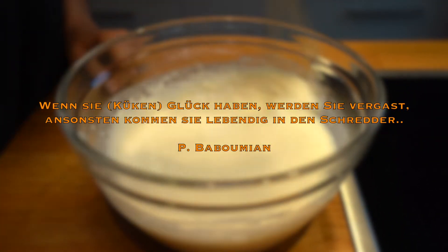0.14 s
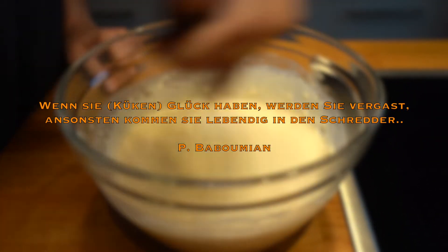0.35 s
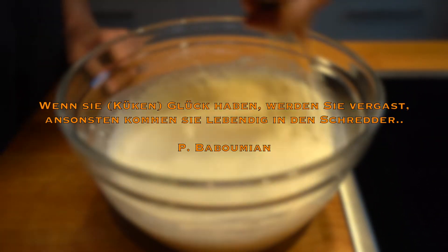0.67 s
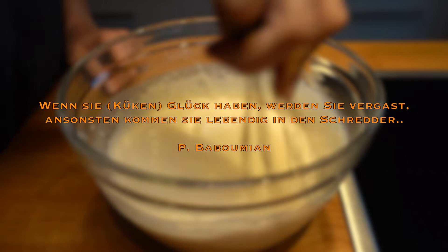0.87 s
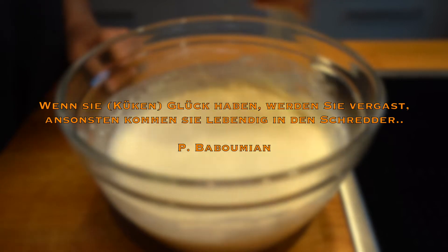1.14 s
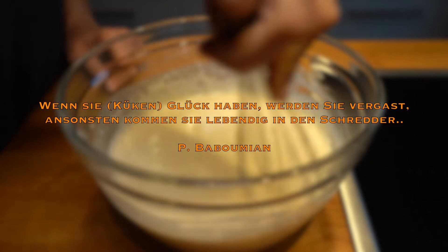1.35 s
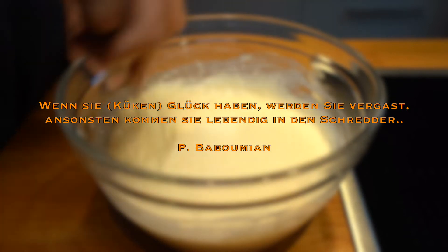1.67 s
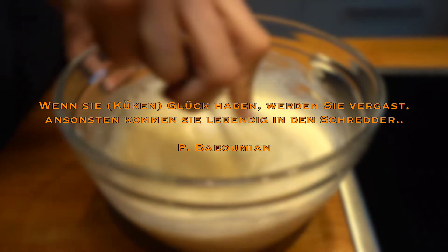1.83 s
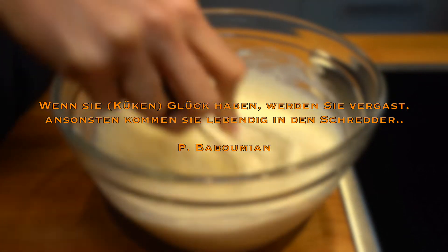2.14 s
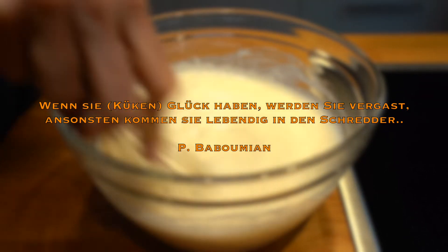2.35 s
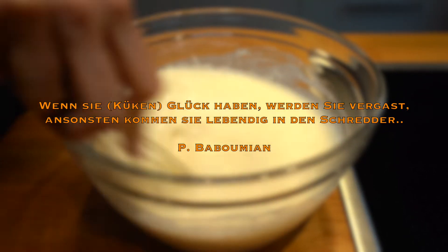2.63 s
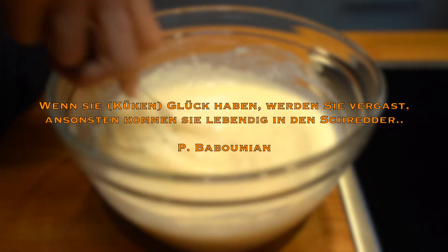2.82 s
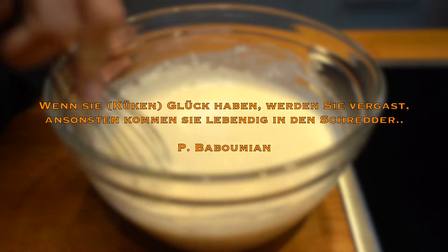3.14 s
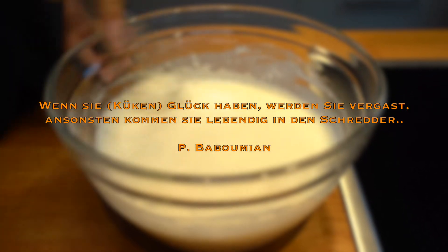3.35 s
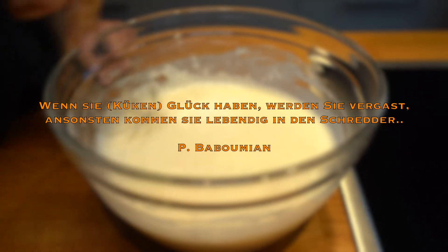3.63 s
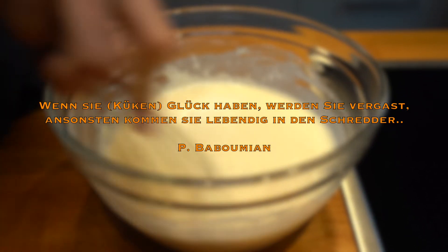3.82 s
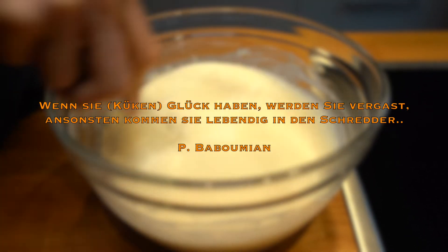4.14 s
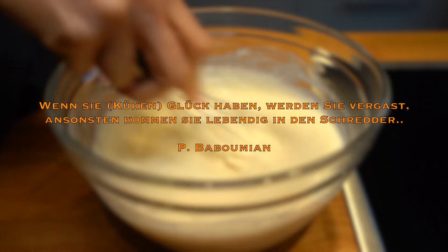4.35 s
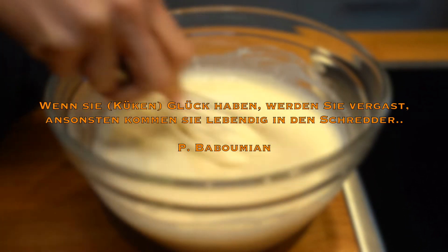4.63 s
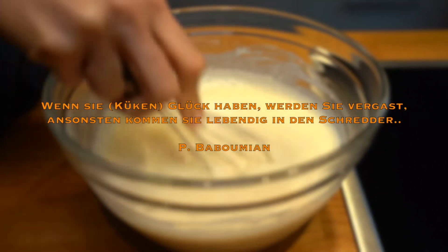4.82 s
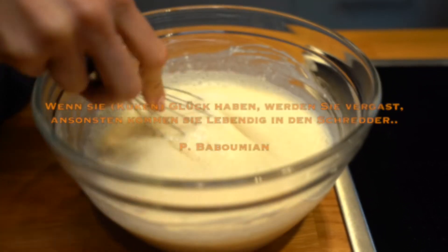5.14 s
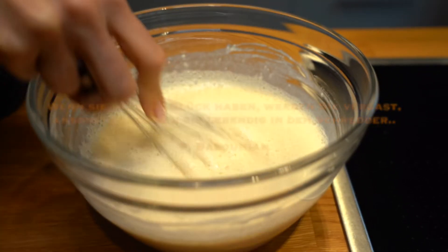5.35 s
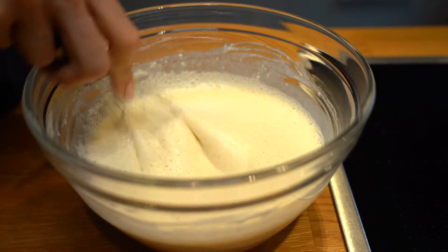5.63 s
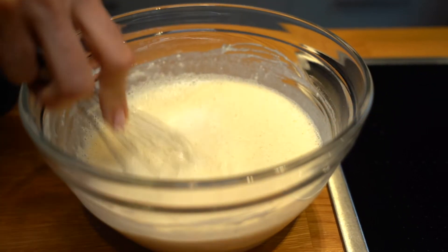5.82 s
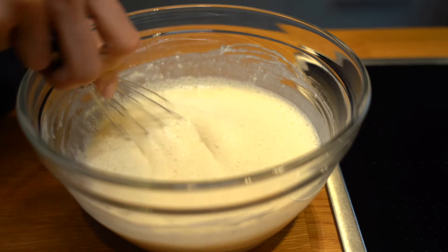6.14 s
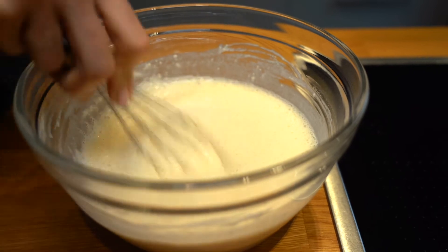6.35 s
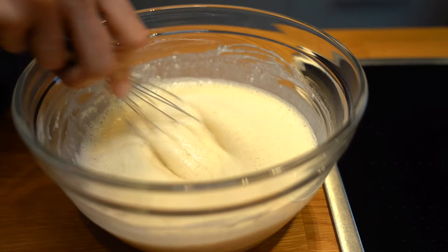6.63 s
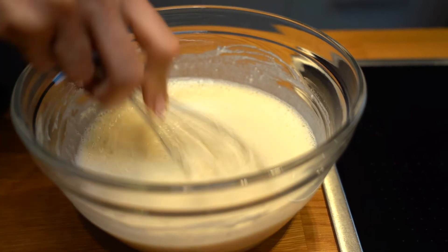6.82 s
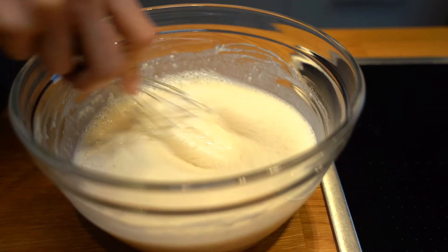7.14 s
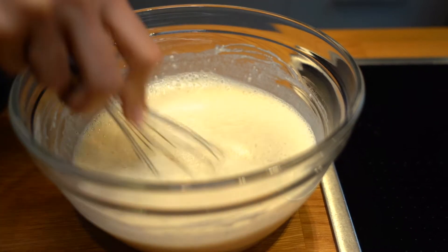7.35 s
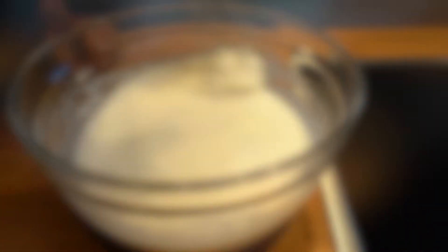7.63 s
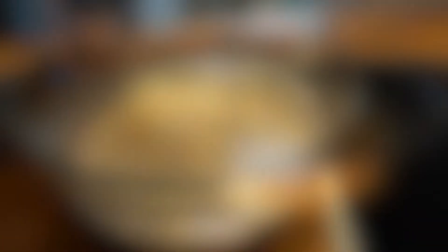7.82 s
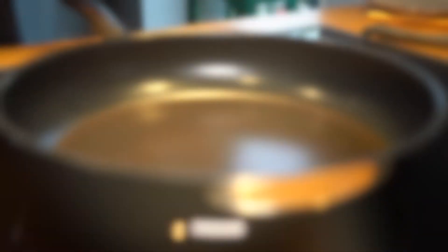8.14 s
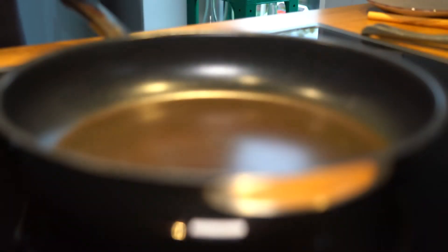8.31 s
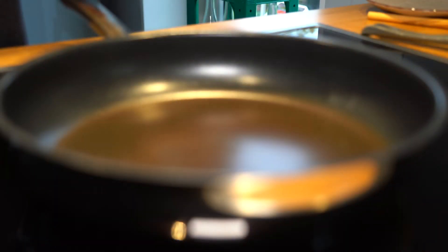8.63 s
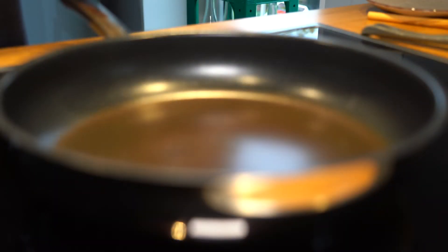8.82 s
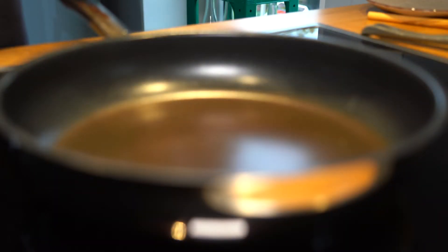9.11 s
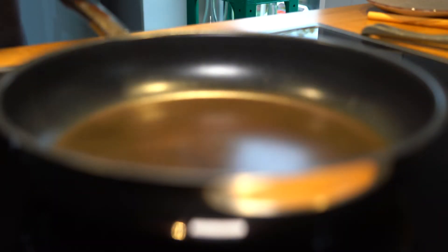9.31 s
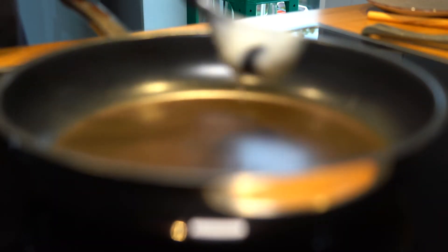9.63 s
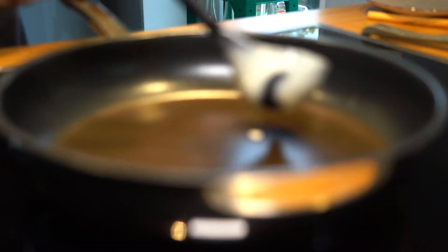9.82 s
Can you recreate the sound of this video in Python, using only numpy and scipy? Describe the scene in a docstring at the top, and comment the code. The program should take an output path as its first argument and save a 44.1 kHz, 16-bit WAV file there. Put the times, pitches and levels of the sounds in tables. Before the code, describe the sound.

A small kitchen, miked closely, with very faint room tone and a short dull reflection. From 0 to 2 s a wire whisk goes round slowly and unevenly in thin batter: wires scrape the glass bowl into brief ringing, with frothy swishes, ticks and a strong clatter near 1.2 s. From 2 to 4 s it is softer and sparser, with low wet plops and knocks, and a few scrapes around 3.6 s. From about 4.1 to 7.1 s it beats quickly, about eight strokes a second, wet and gurgling with bright wire ticks; the bowl thumps hard on the worktop at 6.5 s. Beating dwindles, and a glassy knock sounds at 7.7 s. From 7.5 to 8.3 s hob fan noise swells in with airy vents, crackling hiss, sizzle and thin high whine, then gradually gets duller and quieter. A pan drones roughly at 8.1-8.3 s; two low knocks follow at 9.3 and 9.4 s.

```python
"""A small kitchen, microphone close: a wire whisk beats thin batter in a glass bowl over faint room tone.
At first slow rounds: wires scrape the glass into ringing, swish through froth (swarms of tiny pings),
tick and knock; air pockets plop as damped, rising sines. Then about eight beats a second, with gurgles.
Late on the hob swells in: filtered-noise fan and vents, a crackling hiss, a sizzle and a thin whine.
A pan drones briefly on the hob, and near the end the bowl knocks twice on the worktop."""
import sys
import numpy as np
from scipy import signal
from scipy.fft import rfft, irfft
from scipy.io import wavfile
from scipy.ndimage import uniform_filter1d, map_coordinates

SR = 44100
rng = np.random.default_rng(int(sys.argv[2]) if len(sys.argv) > 2 else 0)


def dump_mix(stems):
    """Bounce the given channels to the path in sys.argv[1] as a 16-bit WAV at rate SR."""
    frames = np.atleast_2d(stems).T  # one column per channel
    limited = np.clip(frames, -1, 1)  # hard clip at full scale
    pcm = np.round(limited * 32767).astype(np.int16)
    wavfile.write(sys.argv[1], SR, pcm)


N = 439677
TIME = np.arange(N) / SR
FREQS = np.arange(N // 2 + 1) * SR / N


def undb(db):
    """Decibels to gain."""
    return 10 ** (np.asarray(db) / 20)


def unit(x):
    """Scale to rms 1."""
    return x / np.sqrt(np.mean(x ** 2))


def peak(x):
    """Scale to peak 1."""
    return x / np.abs(x).max()


def add(track, s, x):
    """Mix x into the track from time s."""
    i = max(int(s * SR), 0)
    track[i:i + len(x)] += x[:max(N - i, 0)]


def fade(t, t60):
    """Exponential decay by 60 dB in t60 seconds."""
    return np.exp(-np.log(1000) * t / max(t60, 1e-3))


def filtered(x, cutoff_hz, kind="low"):
    """Second-order Butterworth filter."""
    return signal.sosfilt(signal.butter(2, cutoff_hz, kind, fs=SR, output="sos"), x)


def colour(x, points, resonances=(), size=16384):
    """Causal filter from (f/Hz, level/dB) and (f/Hz, width/Hz, lift/dB); keeps the power of white noise."""
    hz, db = np.transpose(points)
    freqs = np.arange(size // 2 + 1) * SR / size
    curve = np.interp(np.log(freqs + 1), np.log(hz), db)
    for centre, width, lift in resonances:
        curve = curve + lift / (1 + (2 * (freqs - centre) / width) ** 2)
    # folding the cepstrum onto positive times gives the minimum-phase response
    cepstrum = irfft(np.log(unit(undb(curve))))
    cepstrum[1:size // 2] *= 2
    cepstrum[size // 2 + 1:] = 0
    response = irfft(np.exp(rfft(cepstrum)))
    return signal.oaconvolve(x, response)[:N]


def walk(rate):
    """Smooth random wander at about rate steps a second, with a spread near 1."""
    k = max(int(SR / rate), 1)
    steps = np.repeat(rng.standard_normal(N // k + 1), k)[:N]
    return unit(uniform_filter1d(steps, k))


def crackle(n, per_s, spread_db):
    """n samples of random clicks of uneven size, rms 1."""
    chance, size, sign = rng.random((n, 3)).T
    loudness_db = spread_db * np.minimum(-np.log(1 - size), 4)
    clicks = (chance < per_s / SR) * np.sign(sign - .5) * undb(loudness_db)
    return unit(clicks + 1e-9)


def grains(points, count, size, t60, spread_db, patchy_db):
    """Tiny bubbles burst as pings, count at each of size pitches; alike sizes come in swarms; rms 1."""
    hz, db = np.transpose(points)
    out = np.zeros(N)
    swarms = rng.standard_normal((N // 1000 + 2, 64))  # steps of about 23 ms by quarter octaves
    for f in np.geomspace(hz[0], min(hz[-1], .45 * SR), size):
        bursts, when = np.zeros(N), rng.integers(0, N, count)
        swarm = map_coordinates(swarms, [when / 1000, np.full(count, 4 * np.log2(f))], order=1)
        uneven = np.minimum(rng.exponential(size=count), 4)
        bursts[when] = rng.choice([-1, 1], count) * undb(patchy_db * swarm + spread_db * uneven)
        # a two-pole resonator turns each burst into a decaying ping
        r = fade(1 / SR, t60)
        poles = [1, -2 * r * np.cos(2 * np.pi * f / SR), r * r]
        pings = signal.lfilter([1, 0, -1], poles, bursts)
        # sqrt(f): the pitches lie further apart higher up, and the table is per Hz
        out += unit(pings) * np.sqrt(f) * undb(np.interp(np.log(f), np.log(hz), db))
    return unit(out)


def ring(modes, length, detune=0., scatter_db=0.):
    """A struck body's modes; pitch and strength vary with the point of contact."""
    t = np.arange(int(length * SR)) / SR
    out = 0
    for (hz, db, t60), (a, b, c) in zip(modes, rng.standard_normal((len(modes), 3))):
        gain = np.sign(c) * undb(db + scatter_db * a)
        out = out + gain * fade(t, t60) * np.sin(2 * np.pi * hz * (1 + detune * b) * t)
    return out


def bubble(hz, t60, glide):
    """An air pocket in thick liquid: swells within a cycle or two, rises a little in pitch and dies fast."""
    t = np.arange(int(t60 * SR) + 2) / SR
    swell = (1 - np.exp(-t * hz / 1.05)) ** 2
    return peak(swell * fade(t, t60) * np.sin(2 * np.pi * hz * t * (1 + glide * t / t60)))


def resonance(hz, width_hz):
    """A resonance follows a pitch curve, kept ringing by a stream of tiny pushes; fades in and out."""
    n = len(hz)
    turn = np.exp(2j * np.pi * np.cumsum(hz) / SR)
    pushes = crackle(n, per_s=3000, spread_db=3) / turn
    held = signal.lfilter([1], [1, -np.exp(-np.pi * width_hz / SR)], pushes)
    return unit((held * turn).imag) * signal.windows.tukey(n, .6)


def waver(n, depth_db, every=1000):
    """Gain of one mode as whisk and batter load the wall unevenly; a new level every so many samples."""
    steps = rng.standard_normal(SR // 100)
    return undb(depth_db * np.interp(np.arange(n) / every, np.arange(len(steps)), steps))


def glass_mode(hz, t60, split=0.0046, twin=0.75, sway=0.0024, damping_per_s=7.1):
    """The bowl is not quite round, so a mode beats with a twin; moving batter sways its pitch and damps it."""
    t = np.arange(SR // 3) / SR
    apart, phase = 2 * rng.random(2) - 1
    load = np.interp(t, np.linspace(0, .5, 40), rng.standard_normal(40))
    angle = 2 * np.pi * hz * np.cumsum(1 + sway * load) / SR
    pair = np.sin(angle) + twin * np.sin(angle * (1 + split * apart) + np.pi * phase)
    return fade(t, t60) * np.exp(-damping_per_s * t) * pair


# quiet of the room: f/Hz, relative level/dB per Hz
ROOM_SPECTRUM = [(25, -18), (70, -12), (130, 0.5), (200, 5.5), (400, -8), (600, -1), (1000, -11),
                 (3000, -15.5), (8000, -15), (16000, -18)]
# the open bowl colours the room tone: f/Hz, width/Hz, lift/dB
BOWL_HUM_RESONANCES = [(603, 22, 19), (1330, 39, 6)]


def room_tone():
    """The quiet of the room: faint steady noise, coloured by the open bowl."""
    return undb(-73.5) * colour(rng.standard_normal(N), ROOM_SPECTRUM, BOWL_HUM_RESONANCES)


# modes of the glass bowl: f/Hz, level/dB, t60/s before the batter's extra damping
GLASS_MODES = [(596, -13, .45), (1249, 2.5, .33), (2220, 2.5, .33), (3439, .5, .34), (4891, -1, .26),
               (6536, -2, .26), (6745, -5, .13), (8390, -2, .21), (8770, -7, .09), (10450, -12, .13),
               (12640, -9, .1)]
# wires dragged over the glass: t/s, length/s, ring level/dB (loudest 20 ms), rasp level/dB before colouring,
# f/Hz that the slipping favours, favour/dB
SCRAPE_EVENTS = [(0.007, 0.13, -65.5, -70, 1250, 11), (0.157, 0.032, -48.5, -52, 3220, 13),
                 (0.242, 0.056, -41, -50, 3600, 8), (0.294, 0.026, -42, -41.5, 1240, 3),
                 (0.411, 0.038, -46.5, -59, 3200, 26), (0.471, 0.049, -60, -80, 2220, 8),
                 (0.505, 0.046, -57, -73, 3300, 24), (0.559, 0.041, -57, -59, 2220, 11),
                 (0.605, 0.017, -58, -81, 1240, 27), (0.751, 0.01, -55, -41.5, 5700, 17),
                 (0.797, 0.015, -57, -58, 1680, 11), (0.967, 0.095, -54, -77, 2900, 18),
                 (1.068, 0.023, -55.5, -72, 1750, 29), (1.168, 0.074, -54, -71, 3400, 14),
                 (1.202, 0.02, -38, -43, 3400, 6), (1.263, 0.012, -41, -53, 2300, 17),
                 (1.293, 0.021, -51, -77, 2460, 29), (1.366, 0.023, -57.5, -84, 3440, 32),
                 (1.435, 0.043, -55.5, -58, 6550, 20), (1.543, 0.03, -55, -47.5, 1250, 14),
                 (1.617, 0.03, -53, -52.5, 1200, 14), (1.713, 0.026, -41, -43.5, 4300, 14.5),
                 (1.778, 0.02, -63, -56, 1250, 20), (2.137, 0.031, -51.5, -58, 1250, 22),
                 (2.575, 0.043, -57.5, -66, 1250, 23), (2.592, 0.035, -52, -57, 2960, 23),
                 (2.845, 0.0061, -65, -52.5, 2660, 18), (3.073, 0.023, -53, -58.5, 3040, 12),
                 (3.093, 0.025, -53, -89, 1300, 25), (3.189, 0.026, -60.5, -90, 3570, 9),
                 (3.265, 0.018, -65, -77, 1250, 11), (3.588, 0.031, -41.5, -47, 1760, -1.5),
                 (3.61, 0.082, -44.5, -54, 1510, 11), (3.677, 0.021, -45, -46, 5640, 23),
                 (3.725, 0.062, -53.5, -68, 1250, 1), (3.857, 0.02, -55, -56.5, 2220, 12),
                 (3.92, 0.0076, -58, -70, 3440, 32), (4.176, 0.031, -45, -41, 2720, 6),
                 (4.195, 0.039, -49.5, -56, 1810, 15), (6.419, 0.043, -49, -58, 1660, 14),
                 (7.042, 0.05, -53, -52, 2020, 6), (7.624, 0.024, -57, -52.5, 4900, 13),
                 (7.767, 0.14, -51.5, -83, 3800, 10), (7.945, 0.021, -49.5, -66, 5870, 4)]


def scrapes(favour_octaves=0.54, chatter_db=-11, chatter_t60=0.25):
    """Wires stick and slip over glass: a dry rasp pumps the bowl's modes, most near the slipping pitch."""
    rings, rasp = np.zeros(N), np.zeros(N)
    t = np.arange(SR // 4) / SR
    for s, length, ring_db, rasp_db, slip_hz, favour_db in SCRAPE_EVENTS:
        n = int(np.clip(length, .005, .2) * SR)
        # the springy wires chatter on against the wall as they leave it
        slips = undb(chatter_db) * crackle(len(t), per_s=790, spread_db=5.5) * fade(t, chatter_t60)
        slips[:n] += crackle(len(t), per_s=7000, spread_db=2.0)[:n] * signal.windows.tukey(n, .4)
        tone = 0
        for hz, db, t60 in GLASS_MODES:
            lift = favour_db * np.exp(-(np.log2(hz / slip_hz) / favour_octaves) ** 2)
            mode = glass_mode(hz, t60)
            mode = signal.fftconvolve(slips, mode)[:len(mode)]
            tone = tone + undb(db + lift) * unit(mode * waver(len(mode), depth_db=3.0, every=400))
        loudest = np.sqrt(uniform_filter1d(tone ** 2, SR // 50).max())
        add(rings, s, undb(ring_db) * tone / loudest)
        add(rasp, s, undb(rasp_db) * slips)
    rasp_colour = [(40, -24), (75, -27), (150, 8.0), (500, -25.0), (1500, 2), (3000, -18.5),
                   (5500, 8.0), (9000, 1.0), (10500, -1), (16000, -18.0)]
    rasp_resonances = [(1410, 230, 20.0), (2230, 110, 5.5), (2690, 320, 32), (3280, 120, 7.1),
                       (6790, 630, 21.5), (7480, 210, 15.0), (9200, 450, 13.0), (12200, 430, 12.0)]
    return rings + colour(rasp, rasp_colour, rasp_resonances)


STROKE_ATTACK_S, STROKE_ARCH_DB = 0.032, 3  # the wires cut in quickly and run fastest in mid-stroke
SWISH_T60_S, SLOSH_T60_S, FIZZ_T60_S = 0.13, 0.23, 0.21  # dying away after a stroke
# strokes through the batter, slow rounds at first, then about eight beats a second:
# t/s, length/s, wire swish level/dB, batter slosh level/dB, froth fizz level/dB
STROKE_EVENTS = [(0.109, 0.36, -59.5, -71.5, -62), (0.232, 0.051, -52, -57.5, -52),
                 (0.32, 0.37, -65.5, -68, -80), (0.656, 0.086, -66, -77, -66),
                 (0.785, 0.086, -73, -67.5, -78), (0.933, 0.062, -53.5, -72, -55.5),
                 (0.985, 0.032, -44, -87, -49.5), (1.029, 0.041, -51, -65, -80),
                 (1.154, 0.086, -48, -76, -50), (1.193, 0.026, -43, -47.5, -37.5),
                 (1.256, 0.025, -65, -61, -78), (1.336, 0.25, -67.5, -70, -102),
                 (1.524, 0.15, -62.5, -66.5, -57), (1.7, 0.043, -52, -53.5, -48),
                 (1.839, 0.23, -69, -68, -61), (2.099, 0.17, -60.5, -60, -55.5),
                 (2.363, 0.03, -66, -51.5, -65), (2.484, 0.082, -63, -61.5, -64.5),
                 (2.565, 0.081, -59, -52.5, -54.5), (2.775, 0.047, -66, -65, -79),
                 (3.066, 0.029, -67, -56.5, -76), (3.19, 0.25, -74, -85, -74), (3.562, 0.2, -59, -81, -68),
                 (3.754, 0.22, -67.5, -66.5, -82), (3.975, 0.29, -67, -76, -78),
                 (4.067, 0.11, -59, -65, -53), (4.171, 0.11, -57, -49.5, -55),
                 (4.294, 0.21, -61, -64, -61.5), (4.5, 0.17, -76.5, -64.5, -76),
                 (4.616, 0.032, -45.5, -42, -61), (4.717, 0.076, -65, -62.5, -64),
                 (4.845, 0.046, -51, -56.5, -80), (4.969, 0.042, -51.5, -58, -55),
                 (5.076, 0.088, -61, -55, -85), (5.2, 0.081, -58.5, -60, -75),
                 (5.329, 0.09, -59.5, -59, -68), (5.447, 0.084, -61, -63, -67),
                 (5.56, 0.13, -67.5, -69.5, -69), (5.658, 0.014, -66, -44, -70),
                 (5.707, 0.063, -59, -56, -60), (5.827, 0.07, -65, -64, -69),
                 (5.883, 0.038, -65, -54.5, -69), (5.962, 0.058, -55, -56, -66),
                 (6.085, 0.086, -72, -61, -73), (6.212, 0.092, -60.5, -60.5, -72),
                 (6.352, 0.12, -57.5, -56, -63), (6.473, 0.05, -56.5, -65, -68),
                 (6.596, 0.055, -52.5, -54, -54), (6.717, 0.083, -62, -61.5, -79),
                 (6.851, 0.1, -53, -58, -55.5), (6.973, 0.044, -49.5, -52, -55),
                 (7.021, 0.13, -54.5, -61, -62), (7.201, 0.09, -66, -68.5, -69),
                 (7.355, 0.049, -69, -69, -72), (7.61, 0.17, -54.5, -66, -62)]


def strokes():
    """Gains of swish, slosh and fizz over time: each stroke cuts in, arches and dies away; powers add."""
    powers = np.zeros((3, N))
    t = np.arange(SR) / SR
    for s, length, *levels in STROKE_EVENTS:
        arch_db = STROKE_ARCH_DB * (np.sin(np.pi * np.minimum(t / length, 1)) - 2 / np.pi)
        push = np.minimum(t / STROKE_ATTACK_S, 1) * undb(arch_db)
        for track, db, t60 in zip(powers, levels, (SWISH_T60_S, SLOSH_T60_S, FIZZ_T60_S)):
            add(track, s, (undb(db) * push * fade(np.maximum(t - length, 0), t60)) ** 2)
    return np.sqrt(powers)


SQUELCH_DB = -9.5  # larger bubbles, relative to the geometric mean of swish and slosh
# bubbles of the swish, the squelch and the froth: f/Hz, relative level/dB per Hz
SWISH_SPECTRUM = [(1700, 1), (2900, 12), (4500, 10), (7000, -4.5), (9000, 11.5), (10500, -15), (15500, -28)]
SQUELCH_SPECTRUM = [(750, 16), (1100, -7), (1600, 11.5), (2100, -13), (3000, -28)]
FIZZ_SPECTRUM = [(6000, 1.5), (9000, 1.5), (10500, -8), (13500, 1.5), (15800, -13.5)]
# the wet wires colour the swish: f/Hz, width/Hz, lift/dB
WIRE_RESONANCES = [(2500, 250, 2.5), (2990, 390, 0.5), (4100, 400, 2), (5380, 240, 5), (7000, 310, 7),
                   (7820, 160, 2)]


def swish(swish_gain, slosh_gain, fizz_gain):
    """Wires tear the surface into a dense stream of bubbles; larger ones squelch, froth fizzes behind."""
    tearing = grains(SWISH_SPECTRUM, count=3500, size=50, t60=0.02, spread_db=4.5, patchy_db=6.0)
    tearing = tearing * undb(2.2 * walk(rate=78))
    tearing = unit(colour(tearing, [(1000, 0), (16000, 0)], WIRE_RESONANCES))
    squelch = grains(SQUELCH_SPECTRUM, count=1800, size=16, t60=0.027, spread_db=4.0, patchy_db=4)
    squelch = squelch * undb(SQUELCH_DB + 1.2 * walk(rate=48))
    froth = grains(FIZZ_SPECTRUM, count=12000, size=26, t60=0.005, spread_db=6.0, patchy_db=7.5)
    froth = froth * undb(2.5 * walk(rate=160))
    return swish_gain * tearing + np.sqrt(swish_gain * slosh_gain) * squelch + fizz_gain * froth


def slosh(slosh_gain, count=9000, centre_hz=600, octaves=0.726, spread_db=2):
    """The churned batter: small, heavily damped bubbles, with a rumble as its mass rocks the bowl."""
    out = np.zeros(N)
    times = rng.uniform(0, N / SR, count)
    for when, pitch, size in zip(times, rng.standard_normal(count), rng.standard_normal(count)):
        hz = np.clip(centre_hz * 2 ** (octaves * pitch), 110, 2400)
        add(out, when, undb(spread_db * size) * bubble(hz, t60=0.025, glide=0.08))
    rumble_colour = [(25, -32), (70, -23.0), (140, 3.5), (220, 0.5), (500, -54.0), (4000, -68)]
    rumble = colour(rng.standard_normal(N), rumble_colour)
    return (unit(out) + undb(-12) * rumble) * slosh_gain


# modes of the whisk loops: f/Hz, level/dB, t60/s
WIRE_MODES = [(2870, 3.5, 0.015), (3930, 11, 0.013), (5000, -3.5, 0.0074), (6260, 9.5, 0.019),
              (6730, 10.5, 0.024), (7800, 3, 0.024), (8800, 28, 0.025), (8900, 0, 0.14), (10750, -2, 0.02),
              (12500, 4, 0.021)]
# wires flicking together: t/s, ring peak level/dB, dry snap level/dB before trim and colouring
TICK_EVENTS = [(0.426, -44.5, -58), (0.557, -51, -42), (.681, -58, -46), (0.699, -47, -60),
               (0.7512, -36, -49), (1.001, -45, -57), (1.0562, -55, -26), (1.067, -65, -37),
               (1.209, -30, -25.5), (1.2228, -31, -21.5), (1.547, -43, -36.5), (1.713, -38, -51),
               (1.8532, -45, -75), (2.112, -42.5, -45), (2.18, -50, -52), (2.248, -46, -48),
               (2.3104, -64, -47.5), (2.3707, -66, -55), (2.384, -58, -49), (2.559, -41.5, -64),
               (2.845, -66, -64), (4.123, -46, -38.5), (4.258, -42, -33.5), (4.4495, -41, -38),
               (4.46, -37, -45), (4.631, -43, -53), (4.741, -58, -44), (4.776, -44, -40), (4.87, -60, -43),
               (5.005, -41, -52), (5.047, -44, -39), (5.078, -66, -45), (5.2696, -35.5, -68),
               (5.3698, -29.5, -36), (5.382, -39, -37), (5.39, -33.5, -55), (5.41, -47, -42),
               (5.42, -59, -52), (5.503, -34.5, -59), (5.513, -46, -66), (5.525, -51, -46),
               (5.56, -53, -45), (5.613, -43, -67), (5.667, -30, -33.5), (5.7313, -42, -70),
               (5.751, -35, -70), (5.764, -30.5, -67), (5.848, -40, -54), (5.912, -28.5, -47),
               (6.054, -42, -82), (6.289, -38, -66), (6.381, -43, -41.5), (6.4098, -29.5, -54),
               (6.5492, -33, -38.5), (6.614, -42, -43), (6.6354, -36.5, -58), (6.658, -23.5, -51),
               (6.768, -43, -49), (6.909, -31.5, -28.5), (6.914, -37, -42), (6.932, -30, -31.5),
               (6.99, -37, -38), (7.208, -47.5, -56), (7.258, -51, -51), (7.378, -54, -66)]


def ticks(count=5, spread_s=0.0046, snap_t60=0.0096, spray_db=-13, spray_t60=0.053,
          snap_attack_s=0.0011, later_db=-9, snap_trim_db=-7.0):
    """Loops collide within a few milliseconds: a wet snap and short bright rings, each loop at its own pitch."""
    rings, snaps = np.zeros(N), np.zeros(N)
    t = np.arange(SR // 10) / SR
    for s, db, snap_db in TICK_EVENTS:
        loops = np.zeros(len(t))
        for late in (np.arange(count) + rng.random(count)) / count * spread_s:
            loop = ring(WIRE_MODES, .2, detune=0.0215, scatter_db=8.5)
            loop = np.pad(loop, (int(late * SR), 0))[:len(t)]
            loops += undb(later_db * late / spread_s) * loop
        add(rings, s, undb(db) * peak(loops))
        snap = fade(np.maximum(t - snap_attack_s, 0), snap_t60) + undb(spray_db) * fade(t, spray_t60)
        snap = snap * np.minimum(t / snap_attack_s, 1)
        add(snaps, s, undb(snap_db + snap_trim_db) * rng.standard_normal(len(t)) * snap)
    snap_colour = [(40, -50), (200, -7), (700, -3.5), (1500, -0.5), (3500, 10.5), (7000, 4.0),
                   (11000, -26.0), (16000, -10.0)]
    snap_resonances = [(1800, 260, 2.3), (2840, 270, 3.4), (3960, 570, 2.8), (5830, 590, 5.9)]
    return rings + colour(snaps, snap_colour, snap_resonances)


# air pockets closing: t/s, reference level/dB (pocket, splat and gurgle are set below it), f/Hz
PLOP_EVENTS = [(0.751, -31.5, 599), (0.84, -48.5, 1050), (1.061, -44, 650), (1.212, -41, 950),
               (1.271, -39, 1470), (1.725, -38.5, 905), (1.954, -45, 375), (2.112, -35, 250),
               (2.125, -44, 138), (2.164, -43, 1400), (2.248, -33.5, 470), (2.255, -38.5, 985),
               (2.308, -43, 1250), (2.371, -33, 634), (2.385, -35.5, 405), (2.402, -34, 280),
               (2.405, -47, 136), (2.523, -45.5, 835), (2.554, -39.5, 1390), (2.609, -32, 376),
               (2.63, -31, 259), (2.663, -39, 145), (2.737, -37, 330), (2.763, -42.5, 320),
               (2.845, -31.5, 597), (3.07, -41, 730), (4.195, -29.5, 348), (4.212, -32.5, 189),
               (4.219, -29, 665), (4.253, -31, 357), (4.447, -32.5, 340), (4.455, -36.5, 1210),
               (4.495, -38.5, 262), (4.554, -35, 634), (4.636, -26.5, 452), (5.002, -32, 724),
               (5.048, -33.5, 1160), (5.078, -31.5, 720), (5.155, -39, 925), (5.17, -45.5, 1420),
               (5.315, -36, 567), (5.329, -42, 750), (5.367, -32.5, 767), (5.503, -46, 790),
               (5.546, -41, 700), (5.558, -29, 620), (5.662, -26, 320), (5.754, -37.5, 800),
               (5.913, -36.5, 1193), (6.052, -41, 483), (6.164, -39.5, 1130), (6.247, -35, 754),
               (6.428, -41, 1400), (6.518, -42, 700), (6.656, -36, 1510), (6.799, -39.5, 364),
               (6.931, -35.5, 1200), (6.989, -33.5, 760), (7.052, -41.5, 624), (7.207, -42.5, 1190),
               (7.247, -44.5, 740)]


def plops(count=8, pocket_db=-2.5, gurgle_db=-13, octaves=0.54, splat_db=-17, splat_t60=0.049,
          closing_s=0.001545, gurgle_s=.032):
    """A wet splat traps a big pocket, which rings and then sheds smaller ones around its pitch."""
    out = np.zeros(N)
    t = np.arange(SR // 8) / SR
    for s, db, hz in PLOP_EVENTS:
        closed = s + closing_s
        # the splat is dull, with a gentle skirt down into the bass
        splat = filtered(rng.standard_normal(len(t)), hz * 0.62)
        splat = unit(filtered(splat, hz * 0.22, "high"))
        add(out, closed, undb(db + splat_db) * splat * fade(t, splat_t60))
        add(out, closed, undb(db + pocket_db) * bubble(hz, t60=0.022, glide=0.06))
        for late, pitch in zip(rng.random(count), rng.standard_normal(count)):
            small_hz = np.clip(1.13 * hz * 2 ** (octaves * pitch), 130, 2400)
            small = bubble(small_hz, t60=0.018, glide=0.021)
            add(out, closed + late * gurgle_s, undb(db + gurgle_db - 13.8 * late) * small)
    return out


def glass_ring(favour_hz, held_t60, favour_db=9):
    """The bowl's modes after one blow, strongest near one pitch and cut short by the resting wires."""
    out = 0
    for hz, db, t60 in GLASS_MODES:
        lift = favour_db * np.exp(-np.log2(hz / favour_hz) ** 2)
        mode = undb(db + lift) * glass_mode(hz, t60)
        out = out + mode * waver(len(mode), depth_db=2) * fade(TIME[:len(mode)], held_t60)
    return out


# bowl damped by batter and worktop: f/Hz, level/dB, t60/s
THUD_MODES = [(350, -11, 0.031), (608, -3.5, 0.04), (744, 3, 0.02), (840, -27, 0.019), (1317, 3.5, 0.016),
              (1850, -1.5, 0.015), (2680, -11, 0.033), (3570, -6, 0.01)]
# whisk head bumping the bowl: t/s, thud peak level/dB, glass ring level/dB relative to the thud,
# f/Hz that the blow favours, t60/s of the damping by the resting wires
KNOCK_EVENTS = [(.7525, -40.5, -2.5, 1300, 0.48), (1.056, -50, -2, 3000, .3),
                (1.209, -35.5, 3.5, 2600, 0.5), (1.724, -37.5, 0, 3180, 0.38),
                (2.249, -31.5, -30, 1250, .2), (2.846, -33, -5.5, 2860, 0.086),
                (3.079, -44, -16, 2500, 0.57), (4.451, -30.5, -23, 1250, .1), (4.642, -32, -24, 2200, .1),
                (5.047, -29.5, -21, 1250, .1), (5.081, -35, -16, 3000, .05), (5.561, -38, -29, 2210, .1),
                (5.665, -26, -33, 1250, .1), (6.659, -28.5, -18, 1250, .2), (7.686, -27, -6.5, 2800, 0.76)]


def knocks():
    """The whisk head bumps the wall: a damped thud together with the ring of the glass."""
    out = np.zeros(N)
    for s, db, ring_db, favour_hz, held_t60 in KNOCK_EVENTS:
        add(out, s, undb(db) * peak(ring(THUD_MODES, .1, detune=0.075, scatter_db=-1.5)))
        add(out, s, undb(db + ring_db) * peak(glass_ring(favour_hz, held_t60)))
    return out


# a wire squeaks on the wet glass: t/s, length/s, level/dB before fading in and out, f/Hz
SQUEAK_EVENTS = [(0.899, 0.023, -59, 5500), (0.901, 0.019, -68, 4250), (0.922, 0.022, -62, 6850)]


def squeaks(width_hz=150):
    """A single wire sings briefly as it slips: a narrow resonance fed by tiny pushes."""
    out = np.zeros(N)
    for s, length, db, hz in SQUEAK_EVENTS:
        add(out, s, undb(db) * resonance(np.full(int(length * SR), hz), width_hz))
    return out


# full bowl on the wooden top: f/Hz, level/dB, t60/s
WORKTOP_MODES = [(92, -23, 0.088), (232, -9, 0.036), (305, -28, 0.3), (334, 5, 0.025), (384, -17.5, 0.066),
                 (450, -3.5, 0.017), (673, -14, 0.065), (763, -18.5, 0.027)]
# the bowl rocks or is nudged, and drops back on the worktop: t/s, peak level/dB
BUMP_EVENTS = [(2.372, -35.5), (4.639, -34), (5.665, -46), (6.412, -38.5), (6.497, -43), (6.5092, -18.5),
               (6.659, -41.5), (9.292, -28.5), (9.401, -31)]


def bumps(attack_s=0.0029):
    """The bowl lands on the worktop: one sharp, low knock that sinks into a short hum."""
    out = np.zeros(N)
    t = np.arange(SR // 4) / SR
    for s, db in BUMP_EVENTS:
        detune = 1 + 0.047 * rng.standard_normal(len(WORKTOP_MODES))
        knock = 0
        for (hz, mode_db, t60), p in zip(WORKTOP_MODES, detune):
            knock = knock + undb(mode_db) * fade(t, t60) * np.sin(2 * np.pi * hz * p * t)
        add(out, s, undb(db) * peak(knock * np.minimum(t / attack_s, 1)))
    return out


# the trough behind the whisk gurgles as it opens or closes:
# t/s, length/s, level/dB before fading in and out, first f/Hz, last f/Hz
TROUGH_EVENTS = [(2.601, 0.084, -47, 380, 302), (4.635, 0.048, -48.5, 420, 332),
                 (4.985, 0.025, -58, 776, 714), (5.079, 0.04, -49.5, 620, 780),
                 (5.236, 0.084, -53.5, 676, 910), (5.309, 0.038, -50, 397, 500),
                 (5.366, 0.042, -49, 830, 735), (5.472, .07, -52.5, 696, 850),
                 (5.672, 0.088, -47.5, 325, 400), (6.235, 0.03, -50, 825, 710),
                 (6.52, 0.073, -48, 370, 320), (6.987, 0.039, -56, 790, 674), (7.043, .08, -50, 338, 288)]


def troughs(width_hz=90):
    """Bursting bubbles ring the hollow behind the whisk, whose pitch glides with its size."""
    out = np.zeros(N)
    for s, length, db, first_hz, last_hz in TROUGH_EVENTS:
        glide = np.geomspace(first_hz, last_hz, int(length * SR))
        add(out, s, undb(db) * resonance(glide, width_hz))
    return out


# the hob's sound swells in, and its parts fall at their own rates (levels hold at the end of the swell)
HOB_START_S, HOB_RISE_S, HOB_RISE_POWER = 7.45, 0.82, 1.425
FAN_DB, FAN_FALL_DB_PER_S = -32, 1.45
AIR_DB, AIR_FALL_DB_PER_S = -46.5, 2
HISS_DB, HISS_FALL_DB_PER_S = -56.5, 12.5
SIZZLE_DB = -49.5  # falls at the rate of the air
WHINE_DB, WHINE_FALL_DB_PER_S = -59.5, 12
AIR_DULL_HZ, AIR_DULL_S = 6545, 3.1  # the air in the vents loses its top over this time
# fan, vents, hiss, and fat ticking in the pan: f/Hz, relative level/dB per Hz
FAN_SPECTRUM = [(25, -36), (50, -16), (75, -24), (125, -1.5), (190, 0), (260, 0.5), (385, -7.5), (470, -5),
                (700, -4.5), (1040, -7.5), (1280, -6.5), (1700, -16.5), (3000, -21.5), (6000, -61.5)]
AIR_SPECTRUM = [(1500, 11.5), (3500, 11.5), (4700, 8.5), (6000, 4.5), (7500, -4), (9000, -53), (10500, -78),
                (16000, -39)]
HISS_SPECTRUM = [(4000, -8.5), (6500, 3.5), (8800, 6), (10500, -9.5), (12500, -16), (16000, -11)]
SIZZLE_SPECTRUM = [(900, -1), (1500, -5), (2800, -0.5), (5000, -10), (8000, -18)]
# resonances of the fan housing: f/Hz, width/Hz, lift/dB
HOUSING_RESONANCES = [(49, 8, -1), (95, 51, 4.5), (173, 12, 5.5), (233, 10.4, 7), (298.8, 10, 12.5),
                      (488, 64, 4), (622, 38, 4.5), (787, 41, 10), (954, 20, 5.5), (1240, 14, 7),
                      (1680, 23, 7.5), (1957, 51, 8.5)]


def hob(whine_hz=13420, whine_width_hz=340):
    """Fan turbulence in its housing, air through the vents, hiss, sizzle and a wavering electronic whine."""
    since = TIME - HOB_START_S
    swell = np.clip(since / HOB_RISE_S, 0, 1) ** HOB_RISE_POWER
    age = np.maximum(since, 0) - HOB_RISE_S  # zero at the end of the swell

    fan = colour(rng.standard_normal(N), FAN_SPECTRUM, HOUSING_RESONANCES)
    fan = fan * undb(FAN_DB - FAN_FALL_DB_PER_S * age + .5 * walk(rate=20))

    vents = [(4470, 120, 5.8), (5040, 130, 5.5), (2760, 70, 11.3), (7040, 240, 7.6)]
    air = colour(rng.standard_normal(N), AIR_SPECTRUM, vents)
    dull = signal.sosfiltfilt(signal.butter(2, AIR_DULL_HZ, fs=SR, output="sos"), air)
    air = air + np.clip(age / AIR_DULL_S, 0, 1) * (dull - air)
    air = air * undb(AIR_DB - AIR_FALL_DB_PER_S * age + 0.56 * walk(rate=20))

    hiss = colour(crackle(N, per_s=4500, spread_db=4.5), HISS_SPECTRUM)
    hiss = hiss * undb(HISS_DB - HISS_FALL_DB_PER_S * age)

    sizzle = grains(SIZZLE_SPECTRUM, count=600, size=30, t60=0.037, spread_db=4.5, patchy_db=2.5)
    sizzle = sizzle * undb(SIZZLE_DB - AIR_FALL_DB_PER_S * age)

    # noise narrowed to a thin band
    narrowing = 1 + (2 * (FREQS - whine_hz) / whine_width_hz) ** 2
    whine = unit(irfft(rfft(rng.standard_normal(N)) / narrowing, N))
    whine = whine * undb(WHINE_DB - WHINE_FALL_DB_PER_S * age + 1.6 * walk(rate=12))
    return swell * (fan + air + hiss + sizzle + swell * whine)


SLIDE_SAG_OCTAVES_PER_S = 2.5  # the drone falls as the pan slows
# the pan slides a little on the hob: t/s, length/s, level/dB before fading in and out, starting f/Hz
SLIDE_EVENTS = [(8.079, 0.083, -36, 721), (8.224, 0.12, -36, 716), (8.235, 0.11, -35, 263)]


def pan(width_hz=25):
    """The pan's base rubs on the hob in short, rough drones that sag in pitch."""
    out = np.zeros(N)
    for s, length, db, hz in SLIDE_EVENTS:
        n = int(np.clip(length, .02, .4) * SR)
        sagging = hz * 2 ** (-SLIDE_SAG_OCTAVES_PER_S * TIME[:n])
        pitch = sagging + width_hz / 2 * walk(rate=170)[:n]
        drone = np.sin(2 * np.pi * np.cumsum(pitch) / SR) * undb(4.5 * walk(rate=89)[:n])
        add(out, s, undb(db) * unit(drone) * np.hanning(n))
    return out


def kitchen(x, wet_db=-17.5, t60_low=0.16, t60_high=0.27):
    """Worktop and cupboards answer within milliseconds: a dull, short tail and a faint bright one."""
    t = np.arange(SR // 2) / SR
    low = filtered(rng.standard_normal(len(t)), 1500) * fade(t, t60_low)
    bright = 0.18 * rng.standard_normal(len(t)) * fade(t, t60_high)
    tail = (low + bright) * (t > .004)
    return x + undb(wet_db) * signal.fftconvolve(x, tail / np.linalg.norm(tail))[:N]


def scene():
    """Whisking gives way to the hob over the quiet of the room."""
    quiet = room_tone()
    swish_gain, slosh_gain, fizz_gain = strokes()
    batter = swish(swish_gain, slosh_gain, fizz_gain) + slosh(slosh_gain) + plops() + troughs()
    wires_and_bowl = scrapes() + ticks() + knocks() + squeaks() + bumps()
    return (kitchen(batter + wires_and_bowl + pan()) + hob() + quiet)[None]


def record(dry, low_cut_hz=52, top_hz=15900):
    """The microphone thins the deepest bass and the recorder cuts the top."""
    thinned = filtered(dry, low_cut_hz, "high")
    return signal.sosfilt(signal.ellip(10, .2, 70, top_hz, fs=SR, output="sos"), thinned)


dry = scene()
out = record(dry)
dump_mix(out)
```